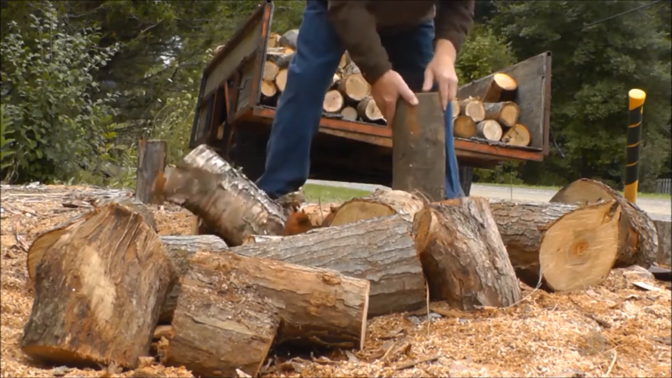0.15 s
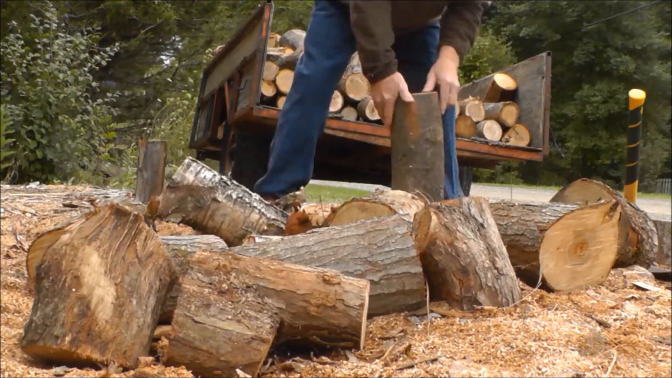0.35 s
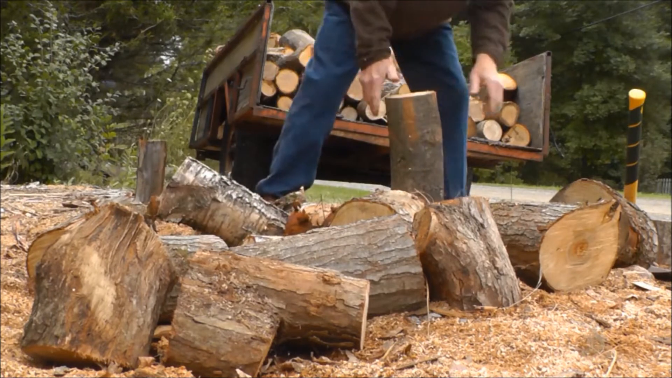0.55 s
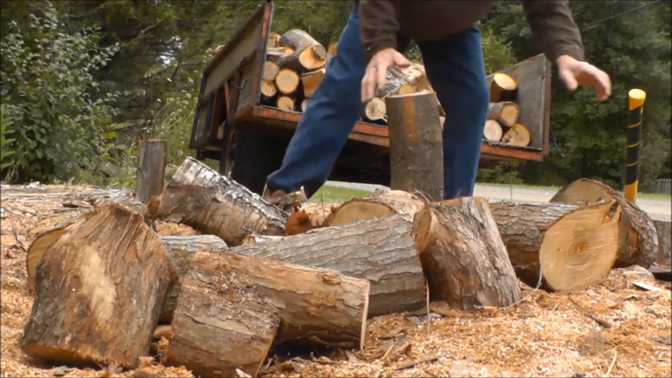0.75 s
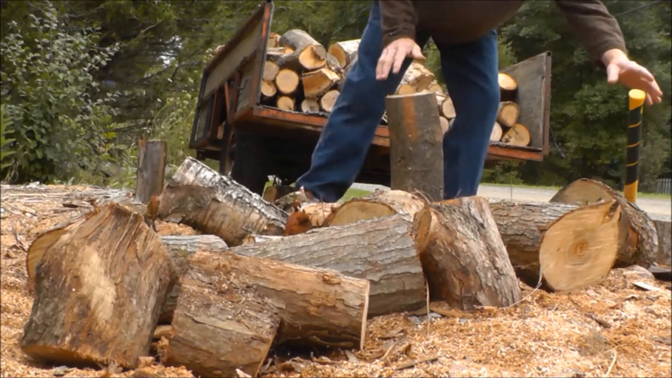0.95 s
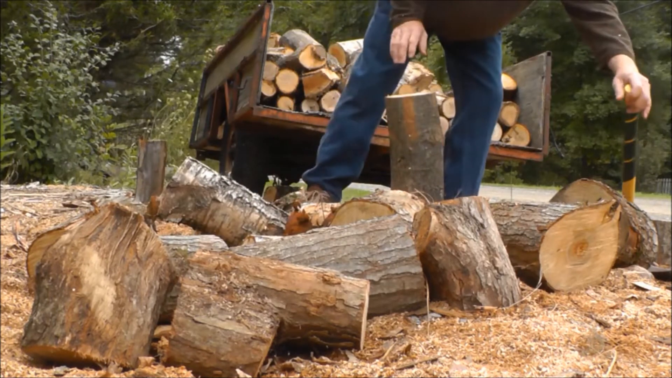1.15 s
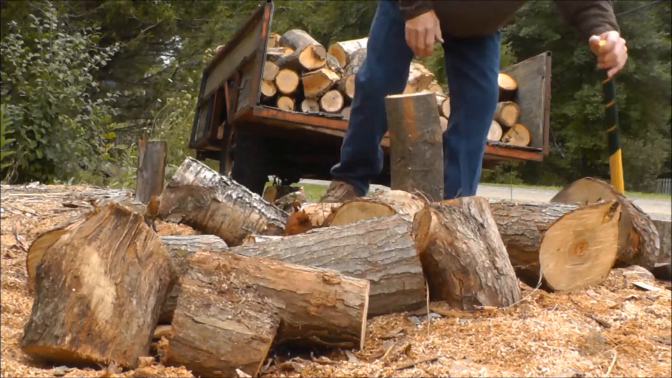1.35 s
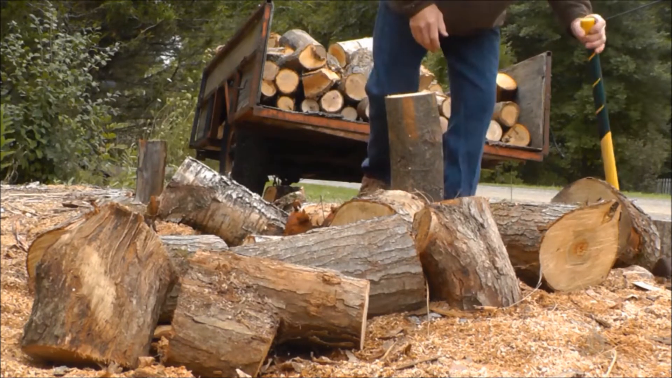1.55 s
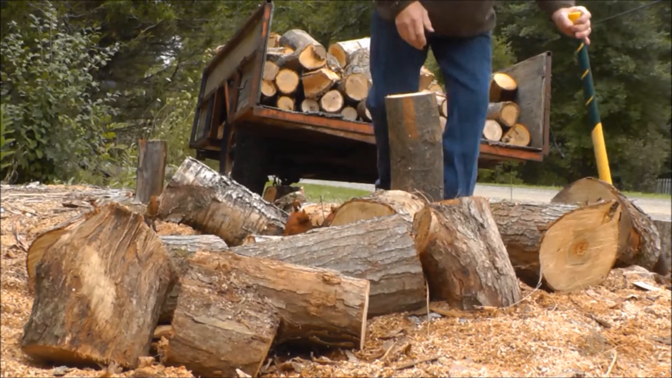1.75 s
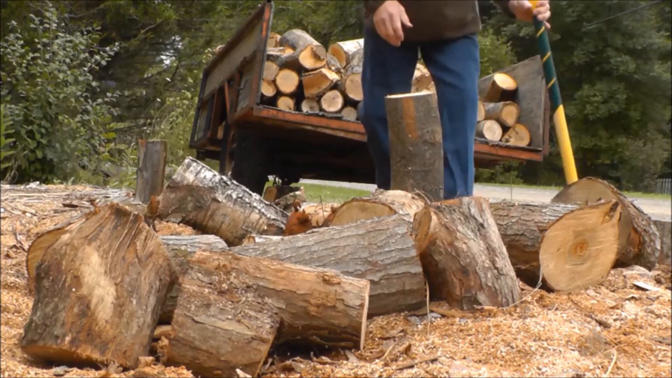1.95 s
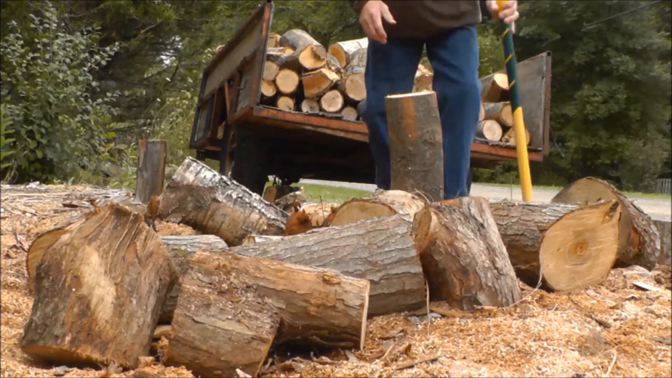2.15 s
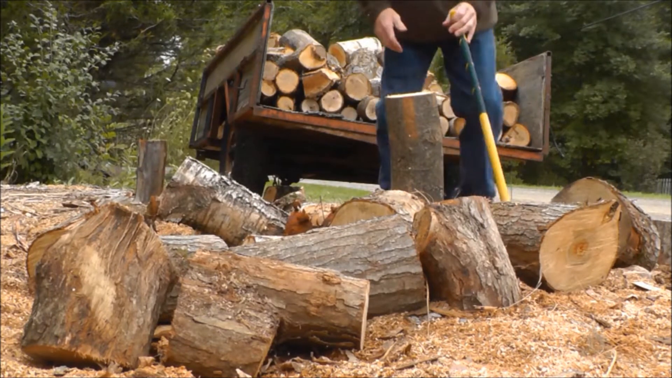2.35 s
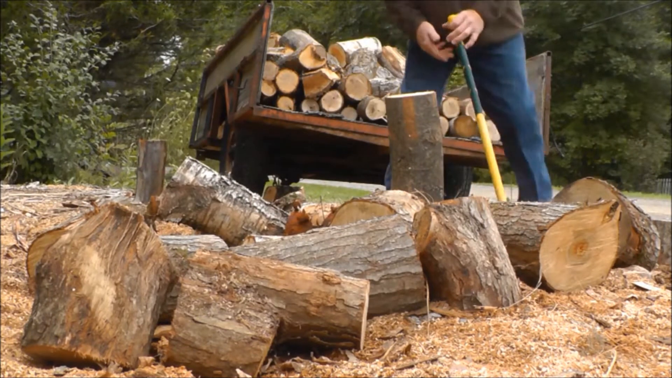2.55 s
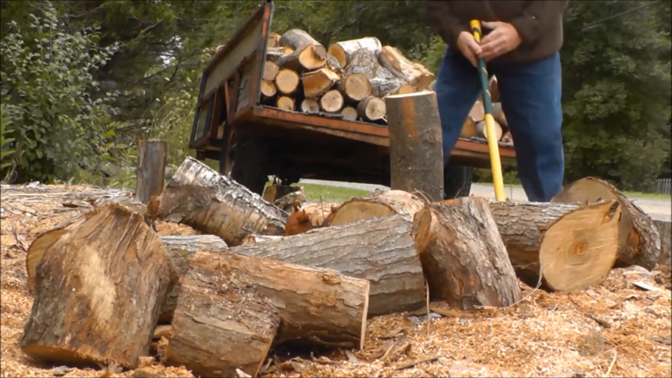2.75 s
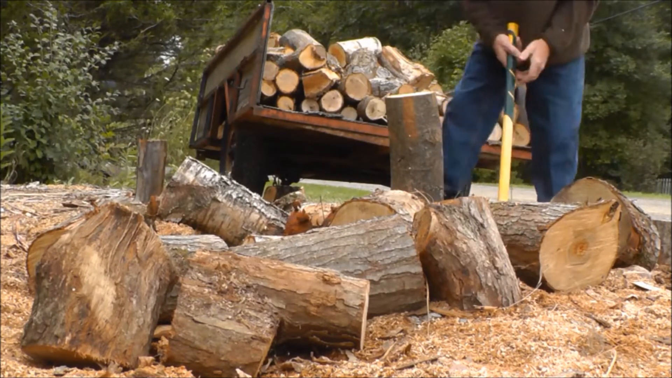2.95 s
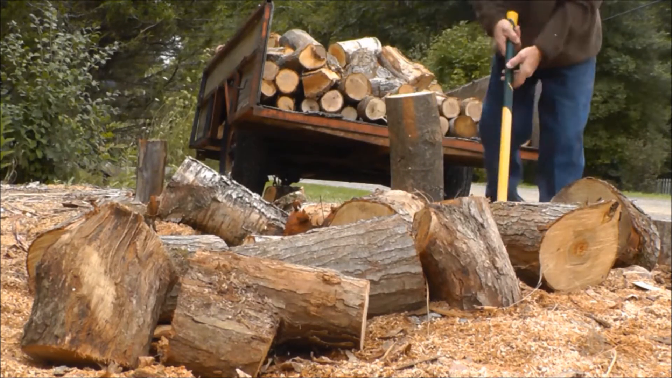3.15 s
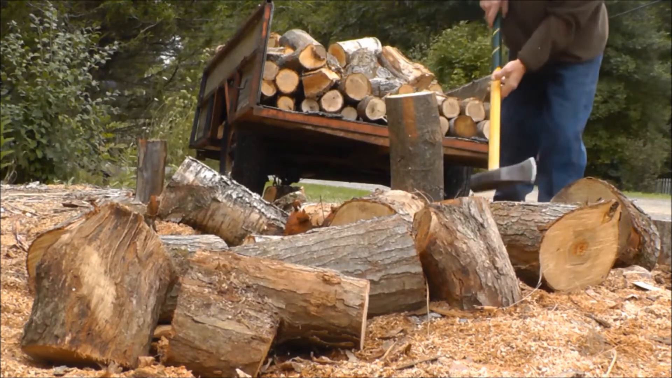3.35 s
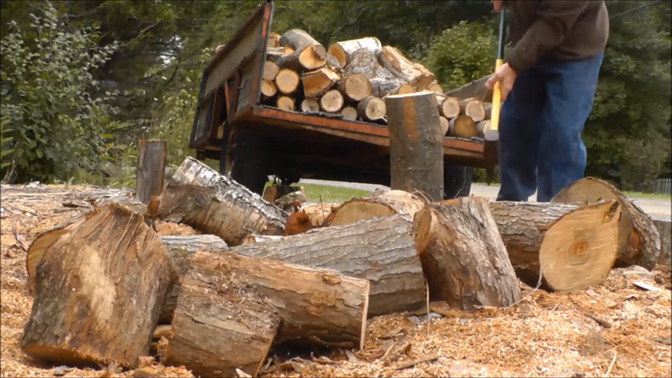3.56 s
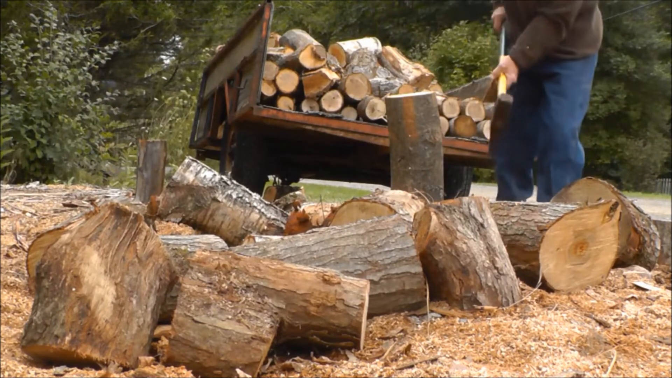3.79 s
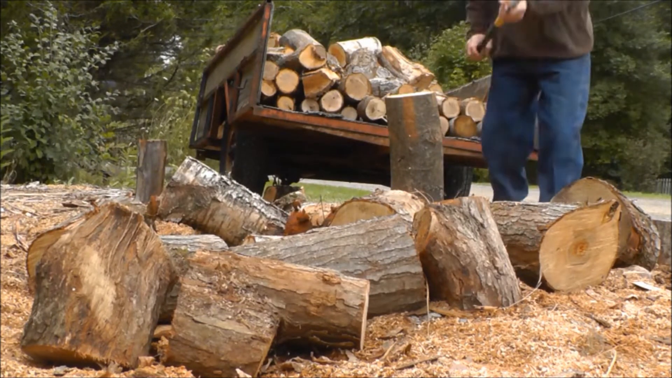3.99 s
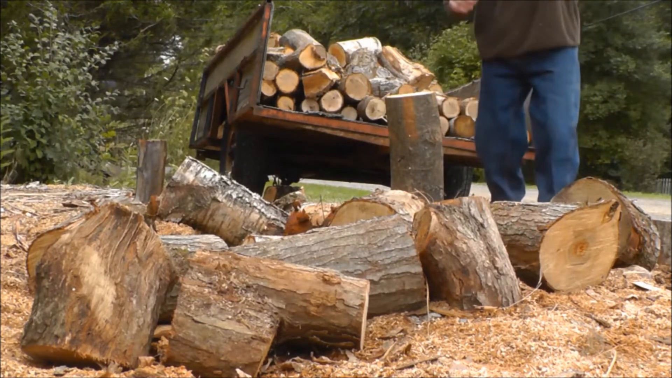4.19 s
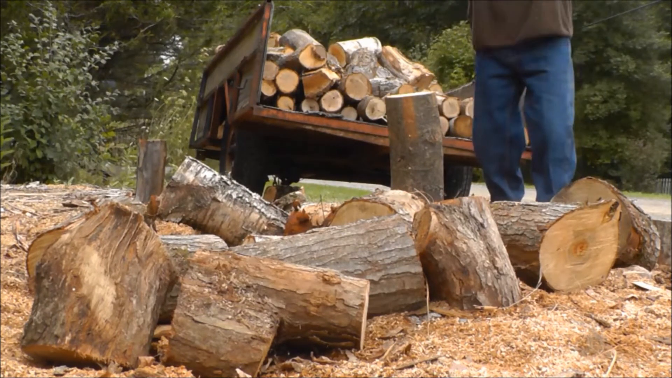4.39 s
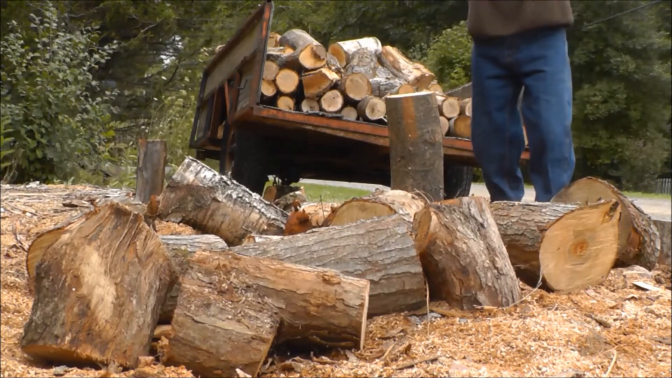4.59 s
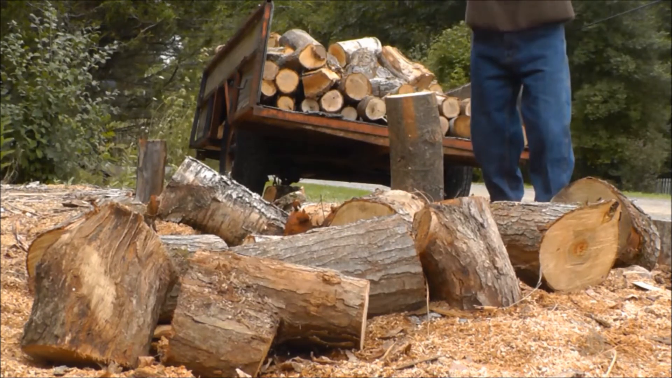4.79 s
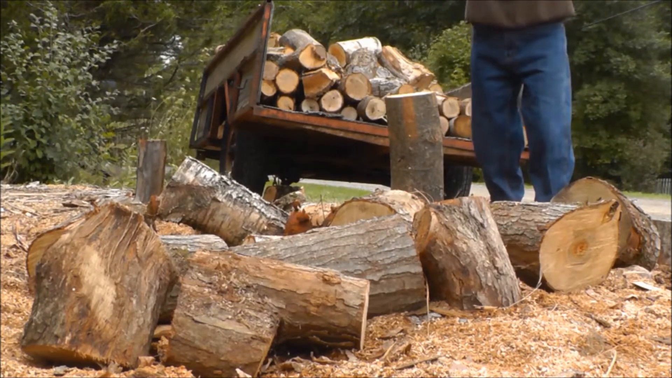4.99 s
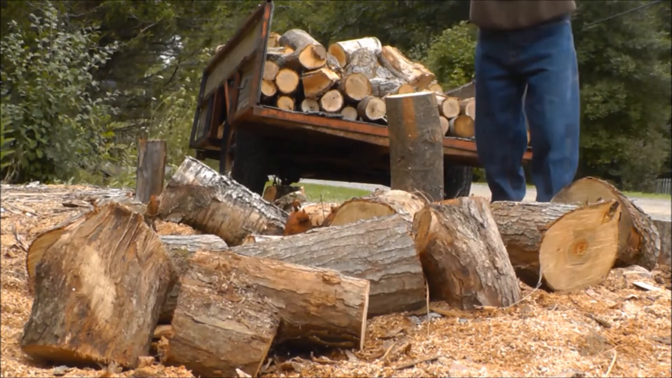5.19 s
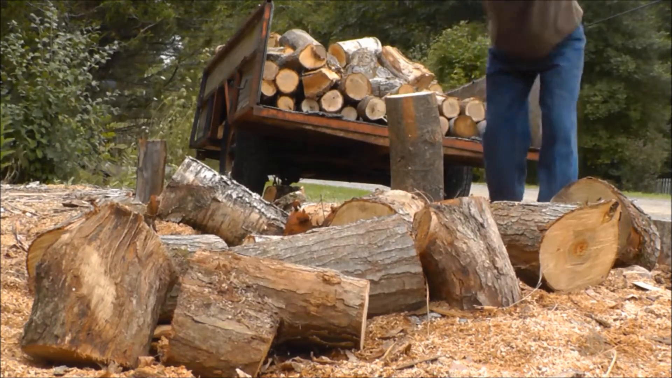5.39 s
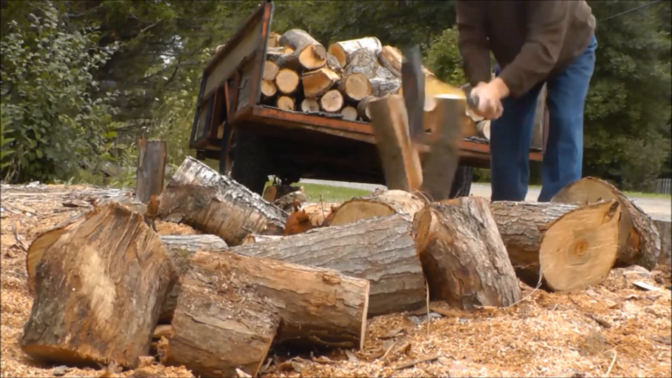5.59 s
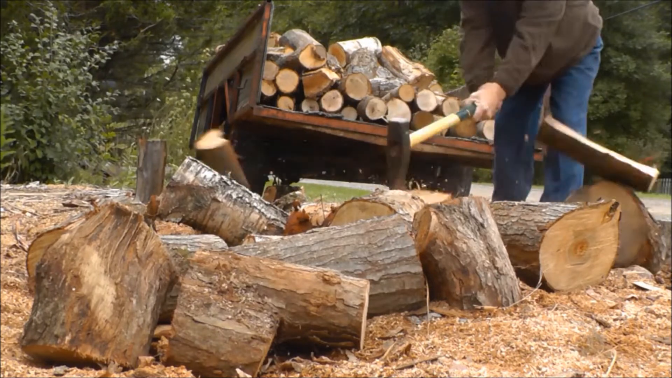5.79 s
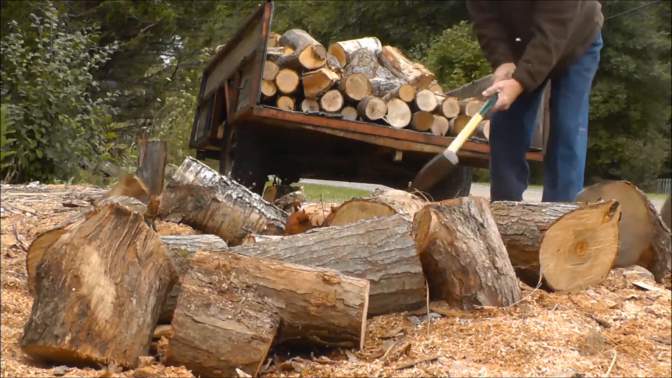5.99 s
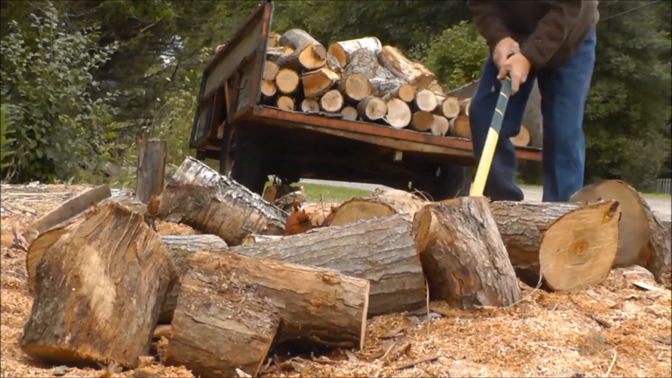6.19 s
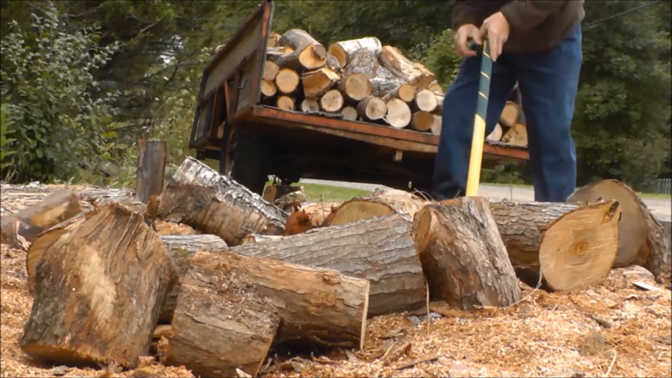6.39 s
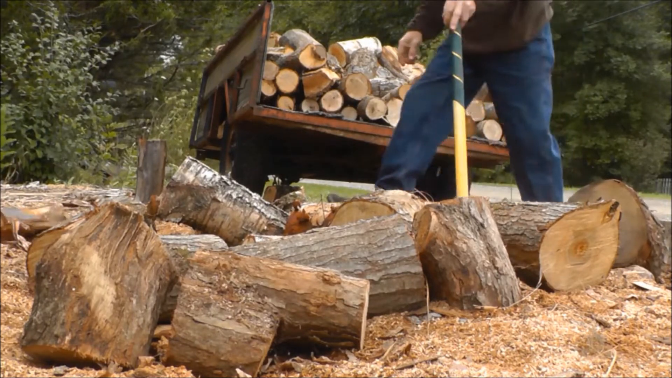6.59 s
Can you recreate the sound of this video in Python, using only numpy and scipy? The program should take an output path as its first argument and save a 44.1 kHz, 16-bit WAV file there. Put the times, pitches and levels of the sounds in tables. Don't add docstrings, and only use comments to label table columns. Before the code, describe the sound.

Hollow wooden knocks as a log is stood up, then several seconds of calm yard air: hissing leaves, low road hum, slight wind on the microphones, harsh far-off bird calls on the right. Near the end comes one explosive, dry split with woody thud and metallic tinge, followed at once by knocks, skidding chips and soft landings, with a short echo from the trees.

```python
import sys
import numpy as np
from scipy import signal
from scipy.fft import rfft, irfft, next_fast_len
from scipy.io import wavfile
from scipy.ndimage import uniform_filter1d, map_coordinates

SR = 44100
rng = np.random.default_rng(int(sys.argv[2]) if len(sys.argv) > 2 else 0)


def transcribe(signal):
    frames = np.atleast_2d(signal).T
    limited = np.clip(frames, -1, 1)
    pcm = np.round(limited * 32767).astype(np.int16)
    wavfile.write(sys.argv[1], SR, pcm)


def linear_from_db(decibels):
    return 10 ** (np.asarray(decibels, float) / 20)


N = 292824


def unit(x):
    return x / np.sqrt(np.mean(x ** 2) + 1e-20)


def along(points, hz):
    f, value = np.transpose(points)
    return np.interp(np.log(hz + 1), np.log(f + 1), value)


def over_time(points):
    s, value = np.transpose(points)
    return np.interp(np.arange(N) / SR, s, value)


def swell(s, rise, hold, t60):
    u = np.arange(N) / SR - s
    return np.clip(u / rise, 0, 1) * linear_from_db(-60 * np.clip(u - rise - hold, 0, None) / t60)


def wobble(rate):
    knots = rng.standard_normal(int(N * rate / SR) + 4)
    return map_coordinates(knots, [np.arange(N) * rate / SR])


def filtered(x, response):
    m = next_fast_len(x.shape[-1] + 8192)
    spectrum = rfft(x, m) * response(np.fft.rfftfreq(m, 1 / SR))
    return irfft(spectrum, m)[..., :x.shape[-1]]


def add(track, s, sound):
    part = track[round(s * SR):][:len(sound)]
    part += sound[:len(part)]


# frequency in Hz, correlation from 0 to 1.
STEREO_LIKENESS = [(60, 0.53), (130, 0.72), (290, 0.82), (640, 0.81), (1410, 0.49), (3100, 0.86),
                   (6820, 0.94), (15000, 0.049)]
QUIET_TOP_HZ = 15700


def rush(spectrum, patchy_db):
    z = signal.stft(rng.standard_normal((2, N + 512)), nperseg=512)[2]
    patches = uniform_filter1d(rng.standard_normal(z.shape[1:]), size=6, axis=0)
    patches = uniform_filter1d(patches, size=14, axis=1)
    pair = signal.istft(z * linear_from_db(patchy_db * unit(patches)), nperseg=512)[1][:, :N]

    def mid_side(hz):
        turn = np.arccos(np.clip(along(STEREO_LIKENESS, hz), -1, 1)) / 2
        return linear_from_db(along(spectrum, hz)) * (hz < QUIET_TOP_HZ) * [np.cos(turn), np.sin(turn)]

    mid, side = filtered(pair, mid_side)
    return unit(np.array([mid + side, mid - side]))


# frequency in Hz,
# level in dB, t60 in seconds.
STAND_RING = (.297, -26), [(200, 1.5, 0.099), (707, 0, 0.084), (506, -3, .07), (1130, -15, .06),
              (1580, -19, .05)]
SPLIT_RING = (5.726, -7), [(366, 0.5, 0.046), (515, -5, 0.078), (720, -1.5, 0.062), (1110, 3, 0.038),
              (1207, 5.5, 0.032), (1465, -4, 0.031), (175, -3.5, 0.06), (646, 5, 0.03), (900, -12, 0.026)]
BITE_RING = (5.763, -11), [(341, 2.5, 0.088), (507, -7, 0.11), (738, 0, 0.1), (885, -8, 0.11),
             (1088, -0.5, 0.055), (1660, -12.5, 0.13), (200, -3.5, 0.093), (132, -15, 0.22),
             (635, -3.5, 0.077), (3811, -40, 0.092), (5050, -21, 0.12), (8680, -26.5, 0.16)]
FALL_RING = (5.847, -20), [(241, -6, 0.036), (471, 2, 0.06), (660, -16.5, 0.067), (900, -12, 0.055),
             (1750, -8, 0.028), (2840, -9, .06)]


def wood():
    out, t = np.zeros(N), np.arange(SR // 3) / SR
    for (s, db), modes in (STAND_RING, SPLIT_RING, BITE_RING, FALL_RING):
        ring = sum(linear_from_db(level - 60 * t / t60) * np.sin(2 * np.pi * hz * t) for hz, level, t60 in modes)
        attack = 1 - np.exp(-t / 0.0014)
        add(out, s, linear_from_db(db - 4.5) * attack * ring)
    return out


# crest in seconds, peak level in dB, frequency in Hz.
SOIL_THUDS = [
    (.203, -35, 186),
    (6.2665, -21, 269),
    (6.317, -29, 243),
    (6.5445, -22.5, 241),
]
WOOD_THUDS = [(.148, -48, 130), (.170, -42, 200), (.186, -45, 231), (.2916, -15.5, 386),
              (.2976, -15.5, 394), (.310, -16.5, 385), (5.8486, -9.5, 415), (5.735, -4, 716),
              (5.8545, -17, 606), (5.896, -31.5, 246), (6.027, -26.5, 226), (6.551, -35, 238)]
PILE_THUDS = [(.3058, -29, 570), (.3175, -31, 560), (.324, -35, 640), (.331, -41, 74), (1.621, -52.5, 80),
              (2.245, -45, 200), (3.28, -49.5, 242), (5.73, -14.5, 496), (5.7317, -14, 225),
              (5.7712, -14, 380), (5.861, -23.5, 450), (6.141, -42.5, 200), (6.272, -34.5, 510),
              (6.308, -36, 440), (6.326, -42, 300), (6.31, -38, 50.6)]
SOIL_CYCLES, WOOD_CYCLES, PILE_CYCLES = 2.2, 4.2, 11.5
SOIL_DULL_DB = -13


def thuds():
    out, t = np.zeros(N), np.arange(-SR // 20, SR // 4) / SR
    surfaces = [(SOIL_THUDS, SOIL_CYCLES, SOIL_DULL_DB), (WOOD_THUDS, WOOD_CYCLES, 0),
                (PILE_THUDS, PILE_CYCLES, 0)]
    for rows, cycles, dull_db in surfaces:
        for s, db, hz in rows:
            modes = [(hz, -2), (hz + 310, -14 + .15 * dull_db), (hz + 720, -30 + dull_db)]  # (Hz, dB)
            for f, level in modes:
                press = np.exp(-(1.9 * t * f) ** 2)
                since_crest = np.hypot(t, 0.27 / f) - 0.29 / f
                release = linear_from_db(-60 / (cycles / hz) * since_crest)
                shape = np.where(t < 0, press, release)
                add(out, s + t[0], linear_from_db(db + level) * shape * np.cos(2 * np.pi * f * t))
    return out


# start in seconds, peak level in dB, centre in Hz, width in octaves.
FIBRE_SNAPS = [(.348, -23, 2960, .5), (0.3477, -29, 8000, .9), (5.7249, -38, 5016, 1.37),
               (5.7256, -4.5, 3200, 1.2), (5.726, -3.5, 9400, .95), (5.7324, -18, 3000, .68),
               (5.7628, -16.5, 4530, .81), (5.8467, -13.5, 1500, 1.7), (5.8462, -20.5, 5960, 0.53),
               (5.8918, -30, 6000, 1.01), (5.966, -44, 9000, .5), (6.011, -38, 2400, .5),
               (6.263, -26, 4000, 1.1), (6.272, -35, 4500, .8), (6.4392, -37, 7000, .7),
               (6.574, -38, 6000, .57), (6.6102, -25.5, 6160, 0.81)]
# start in seconds, peak level in dB, centre in Hz, t60 in seconds.
GRAIN_TEARS = [
    (.342, -39, 3970, 0.18),
    (2.04, -49, 10000, .05),
    (5.726, -22, 3950, 0.14),
    (5.727, -16, 796, 0.14),
    (5.764, -20, 710, 0.17),
    (5.769, -25, 3960, 0.1),
    (5.85, -24, 900, 0.073),
    (5.852, -25.5, 3530, .072),
    (6.1418, -38.5, 3950, 0.069),
    (6.615, -45, 6000, .05),
]
SNAP_T60_S, TEAR_OCTAVES = .013, 0.97


def snaps():
    out, t = np.zeros(N), np.arange(SR // 5) / SR
    fibres = [(*row, SNAP_T60_S) for row in FIBRE_SNAPS]
    tears = [(s, db, hz, TEAR_OCTAVES, t60) for s, db, hz, t60 in GRAIN_TEARS]
    for s, db, hz, octaves, t60 in fibres + tears:
        band = lambda f: np.exp(-(np.log2((f + 1) / hz) / octaves) ** 2)
        noise = unit(filtered(rng.standard_normal(len(t)), band))
        attack = 1 - np.exp(-t / .0004)
        add(out, s, linear_from_db(db - 6 - 60 * t / t60) * attack * noise)
    return out


# start in seconds, level in dB, t60 in seconds, seconds until the wood grips it.
STEEL_STRIKES = [
    (5.763, -19, 0.21, .046),
    (5.85, -23.5, 0.084, .05),
]
# start in seconds, level in dB.
STEEL_STRAYS = [
    (5.8, -50),
    (5.94, -56),
    (6.115, -51),
    (6.24, -52),
    (6.33, -64),
]
STEEL_HZ, STRAY_RISE_S, STRAY_T60_S = 1362, .012, 0.39


def head():
    phase = 2 * np.pi * STEEL_HZ * np.arange(N) / SR
    scattered = unit(wobble(55) * np.sin(phase) + wobble(55) * np.cos(phase))
    sung = sum(linear_from_db(db) * swell(s, .001, 0, t60) * swell(s, .001, free, .02)
               for s, db, t60, free in STEEL_STRIKES)
    strays = sum(linear_from_db(db) * swell(s, STRAY_RISE_S, 0, STRAY_T60_S) for s, db in STEEL_STRAYS)
    return np.sqrt(2) * sung * np.sin(phase) + strays * scattered


# start in seconds, hold in seconds, hiss in dB, rumble over the hiss in dB.
DEBRIS_SKIDS = [
    (5.789, 0.12, -52.5, 10.5),
    (6.126, 0.095, -51.5, -2),
    (6.285, 0.03, -53, -4.5),
    (6.53, .08, -62, -1),
]
# frequency in Hz, level in dB per Hz.
CHIP_SPECTRUM = [(1200, -34), (2100, -16), (3000, 1), (4000, -5.5), (5200, 0), (7500, -6), (10000, -14.5),
                 (15800, -30)]
BARK_SPECTRUM = [(60, -9), (200, -4.5), (500, -4), (1100, -6.5), (1700, -12), (2600, -33), (4000, -120)]
SKID_RISE_S, HISS_T60_S, RUMBLE_T60_S = 0.015, 0.44, 1.22


def debris():
    chips = sum(linear_from_db(db) * swell(s, SKID_RISE_S, hold, HISS_T60_S) for s, hold, db, _ in DEBRIS_SKIDS)
    bark = sum(linear_from_db(db + over_db) * swell(s, SKID_RISE_S, hold, RUMBLE_T60_S)
               for s, hold, db, over_db in DEBRIS_SKIDS)
    hiss = chips * linear_from_db(1.2 * wobble(60) + 1.5 * wobble(900)) * rush(CHIP_SPECTRUM, patchy_db=2.2)
    rumble = bark * linear_from_db(wobble(50)) * rush(BARK_SPECTRUM, patchy_db=2.5)
    return hiss + rumble


# time in seconds, level in dB.
SWING_LEVEL = [(5.46, -84), (5.54, -57), (5.6, -66), (5.68, -82)]
# frequency in Hz, level in dB per Hz.
SWISH_SPECTRUM = [(2500, -120), (4000, -4), (7000, -2), (11000, -12), (15800, -14)]


def swing():
    start, end = SWING_LEVEL[0][0], SWING_LEVEL[-1][0]
    gate = over_time([(start - .02, 0), (start, 1), (end, 1), (end + .02, 0)])
    return linear_from_db(over_time(SWING_LEVEL)) * gate * rush(SWISH_SPECTRUM, patchy_db=.4)


# start in seconds, fourth partial in dB, pitch in Hz, scoop time in seconds,
# second partial over the fourth in dB.
JAY_CALLS = [
    (.712, -55.5, 886, .016, -13.5),
    (1.085, -56, 866, 0.01597, -1.5),
    (2.38, -67.5, 866, .02, -10),
    (3.088, -54, 895, .03, -13),
    (3.465, -54.5, 884.6, .045, -8.5),
    (5.085, -64, 868, 0.022, -17),
]
CALL_S, START_HZ = .225, 793
SAG, SAG_S = .012, .018
EDGE_DB, THIRD_DB, THIRD_SWELL_S = 6, -6.5, .024
FLUTTER_HZ, FLUTTER_DB, FIRST_GAP_S = 23.5, 10.5, 0.0614
ANSWER_S, ANSWER_DB, ANSWER_HZ = .3, -11.5, 3550


def jay():
    start, level_db, pitch_hz, scoop_s, throat_db = np.transpose(JAY_CALLS)
    t = np.arange(N) / SR
    call = np.clip(np.searchsorted(start, t) - 1, 0, None)
    u = np.clip(t - start[call], 0, CALL_S)

    sag = 1 - SAG * np.exp((u - CALL_S) / SAG_S)
    scoop_hz = (pitch_hz[call] - START_HZ) * np.exp(-u / scoop_s[call])
    hz = pitch_hz[call] * sag - scoop_hz
    cycle = 2 * np.pi * np.cumsum(hz) / SR + 0.15 * wobble(120)
    beat = 2 * np.pi * np.cumsum(85 + 14 * wobble(20)) / SR
    depth = np.clip(0.37 + 0.43 * wobble(12), 0, 1)

    gaps = np.clip(np.cos(2 * np.pi * FLUTTER_HZ * (u - FIRST_GAP_S)), 0, 1) ** 2 * (u > .03)
    flare = (2 * u / CALL_S - 1.15) ** 2 - .55
    fourth_db = level_db[call] + EDGE_DB * flare - FLUTTER_DB * (gaps - .2)
    third_db = level_db[call] + THIRD_DB - 22 * np.exp(-u / THIRD_SWELL_S)
    second_db = level_db[call] + throat_db[call] - 6 * (2 * u / CALL_S - 1) ** 2
    top_db = (third_db + fourth_db) / 2 + 2.2 * wobble(25)
    levels = (second_db, third_db, fourth_db, top_db - 19, top_db - 7.5, top_db - 8.0)

    voice = np.zeros(N)
    for k, db in zip(range(2, 8), levels):
        upper = k > 3
        sideband = depth * upper * np.sin(k * cycle - beat)
        voice += linear_from_db(db + (1.4 + 0.5 * upper) * wobble(45)) * (np.sin(k * cycle) + sideband)
    gate = sum(swell(s, .014, CALL_S - .014, 0.034) for s in start)
    calls = np.sqrt(2) * gate * voice

    def far_slope(f):
        band = -(np.log2((f + 1) / ANSWER_HZ) / .09) ** 2
        return linear_from_db(ANSWER_DB) * np.exp(band - 2j * np.pi * f * ANSWER_S)

    return calls + filtered(np.pad(calls, (0, SR // 4)), far_slope)[:N]


# frequency in Hz, t60 in seconds.
TREE_DECAY = [(150, 0.41), (700, 0.42), (1500, 0.99), (5000, 0.33), (12000, 0.28)]
# frequency in Hz, level in dB.
TREE_LEVEL = [(60, -18), (300, -24.5), (1000, -21.5), (4000, -10), (14000, -14)]


def trees(x):
    hz, t, z = signal.stft(rng.standard_normal((2, SR)), SR, nperseg=256)
    decay = linear_from_db(-60 * t / along(TREE_DECAY, hz)[:, None])
    tail = signal.istft(z * decay, SR, nperseg=256)[1]
    tail = 0.65 * tail[0] + tail * [[0], [.6]] + tail[0] * [[.4], [0]]
    tail = tail / np.linalg.norm(tail[0])
    late = np.pad(x, (300, 0))[None]
    wet = signal.fftconvolve(late, tail, axes=1)[:, :N]
    return filtered(wet, lambda f: linear_from_db(along(TREE_LEVEL, f)))


# time in seconds, level in dB.
BREEZE_LEVEL = [(0, -53.5), (.25, -52.5), (.5, -54), (1.6, -54.5), (2.4, -55), (3.1, -56), (3.7, -56.5),
                (4.1, -57.3), (5.3, -58), (5.7, -56.5)]
# frequency in Hz, level in dB per Hz.
ROAD_SPECTRUM = [(35, -50), (60, -15), (118, -6.5), (178, -6.5), (203, -3.5), (238, -3.5), (306, -4),
                 (410, -2.5), (504, -1.5), (637, -1.5), (854, -5), (2000, -12.5), (2600, -79), (4400, -120)]
LEAF_SPECTRUM = [(1240, -45), (2100, -13), (2750, -6.5), (3360, -6.5), (3630, -7), (3910, -9.5), (4670, -2),
                 (5210, -5.5), (6220, -5), (7240, -9.5), (8350, -12.5), (9400, -18.5), (15200, -31),
                 (15700, -19)]
WIND_SPECTRUM = [(20, -21), (45, -3), (80, -2), (140, -10), (300, -120)]
# crest in seconds, level in dB, half length in seconds.
WIND_GUSTS = [
    (0.154, -66, .2),
    (1.65, -67, 0.34),
]
ROAD_DB, ROAD_FOLLOWS = -56.5, 0.76
CALM_DB = -82


def air():
    breeze_db = over_time(BREEZE_LEVEL)
    road_db = ROAD_DB + ROAD_FOLLOWS * (breeze_db - breeze_db.mean()) + 1.1 * wobble(3.77)
    road = linear_from_db(road_db) * rush(ROAD_SPECTRUM, patchy_db=0.9)
    leaves_db = breeze_db + 1.0 + 0.73 * wobble(6)
    leaves = linear_from_db(leaves_db) * rush([(1000, -120)] + LEAF_SPECTRUM[1:], patchy_db=1.0)
    t = np.arange(N) / SR
    gusts = sum(linear_from_db(db) * np.exp(-((t - s) / half) ** 2) for s, db, half in WIND_GUSTS)
    wind = (linear_from_db(CALM_DB) + gusts) * linear_from_db(1.7 * wobble(5.43)) * rush(WIND_SPECTRUM, patchy_db=-3.5)
    return road + leaves + wind


# frequency in Hz, level in dB.
MIC_COLOUR = [(200, 3), (9000, -0.5), (12000, -11), (16000, -6), (16400, -24), (16650, -120)]


def ports(x):
    copies = [(.00021, -26), (.0005, -14.5), (.0019, -22)]  # (s, dB)

    def response(f):
        side = sum(linear_from_db(db) * np.exp(-2j * np.pi * f * s) for s, db in copies) * f / (f + 900)
        bass_cut = (1j * f / (85 + 1j * f)) ** 2
        return linear_from_db(along(MIC_COLOUR, f)) * bass_cut * (1 + np.array([[1], [-1]]) * side)

    return filtered(x, response)


def scene():
    body, crack, bird = thuds() + wood() + head(), snaps(), jay()
    panned = body * linear_from_db([[-1.1], [.9]]) + crack * linear_from_db([[-.3], [.3]])
    near = ports(panned + trees(body + crack))
    far = bird * linear_from_db([[-2.5], [2.5]]) + linear_from_db(5.5) * trees(bird)
    return near + far + debris() + swing() + air()


def top_cut(x):
    return signal.sosfilt(signal.butter(12, 16640, fs=SR, output="sos"), x)


def record(dry):
    t = np.arange(N) / SR - 5.73
    duck_db = np.where(t > 0, -3 * np.exp(-np.abs(t) / 0.49), 0)
    rounded = dry / (1 + np.abs(dry / .7) ** 4) ** (1 / 4)
    return top_cut(rounded * linear_from_db(duck_db))


dry = scene()
out = record(dry)
transcribe(out)
```